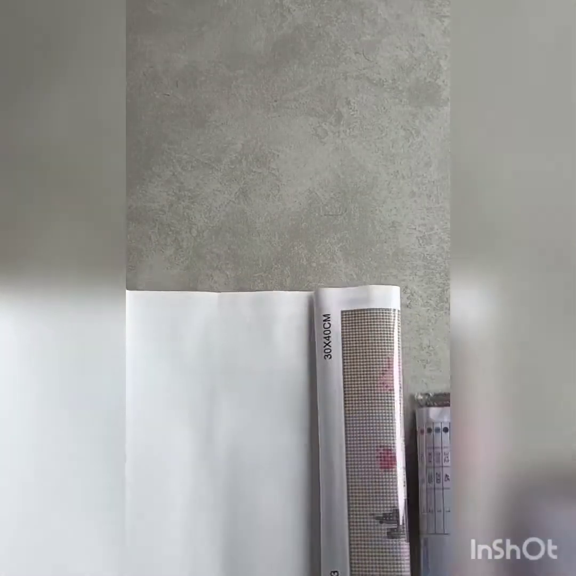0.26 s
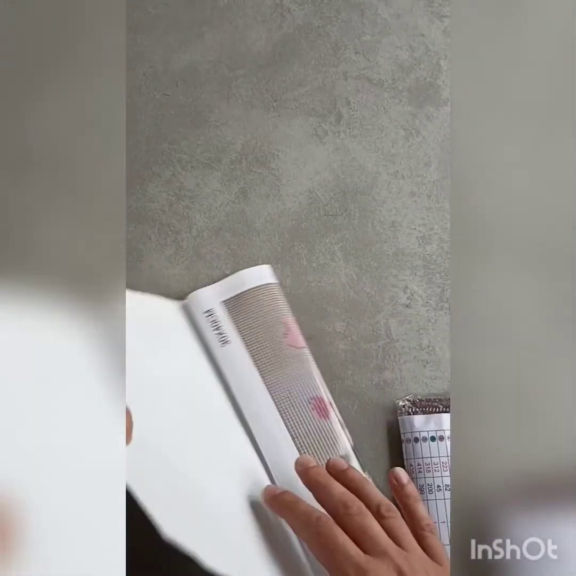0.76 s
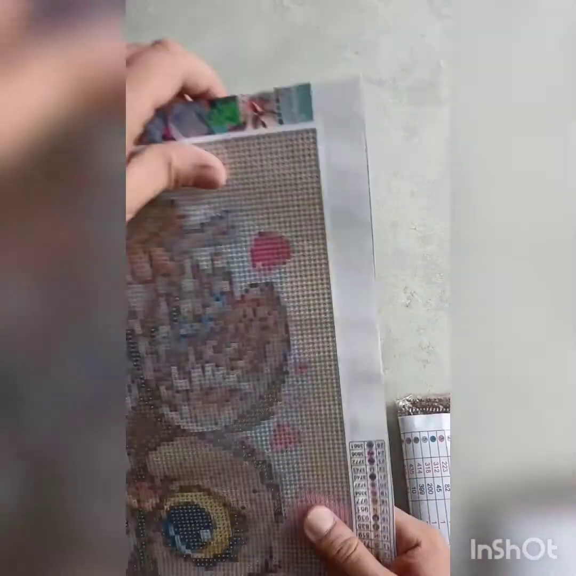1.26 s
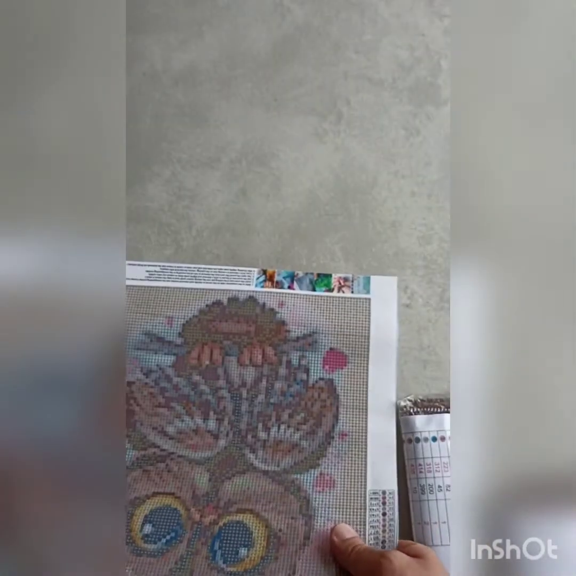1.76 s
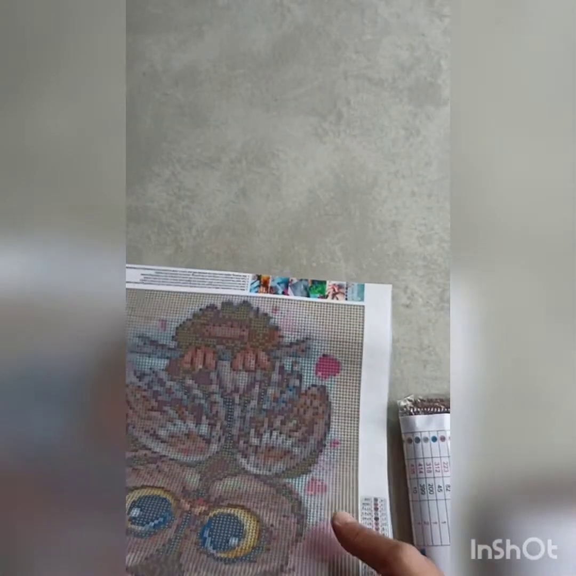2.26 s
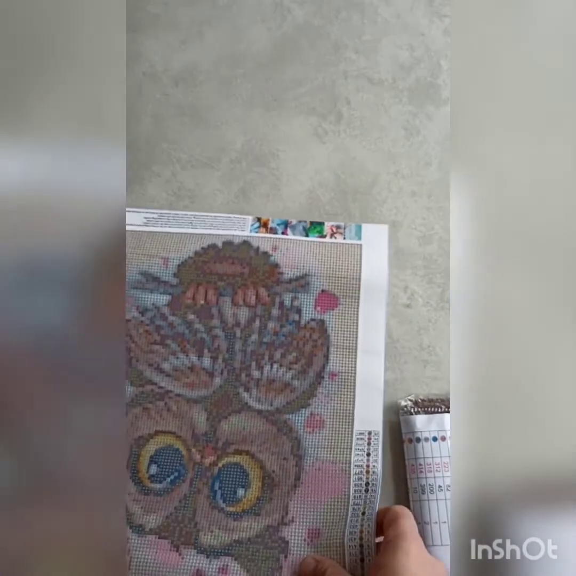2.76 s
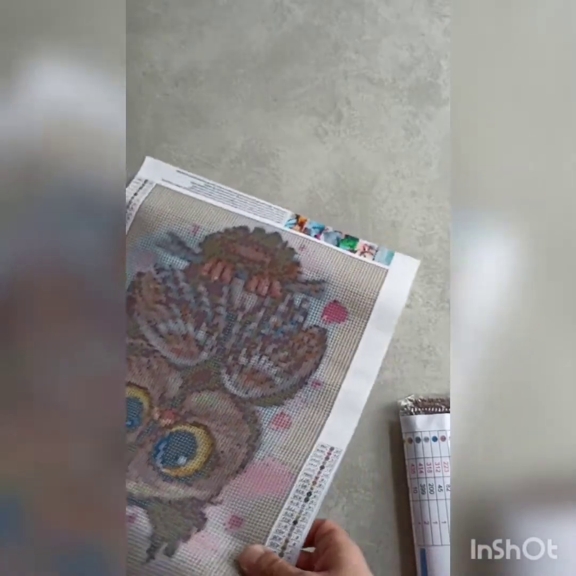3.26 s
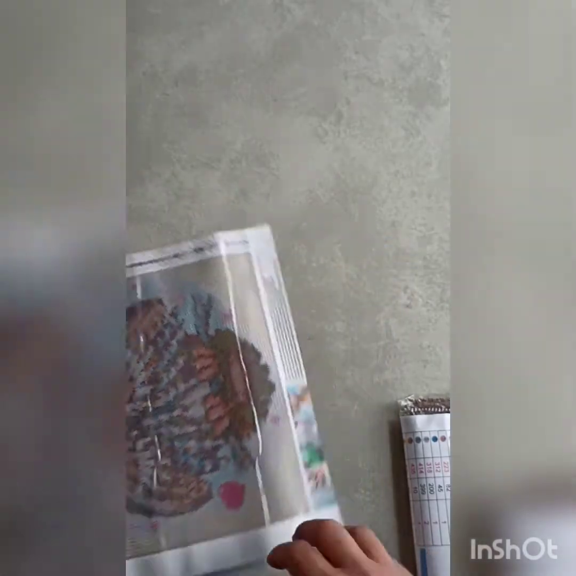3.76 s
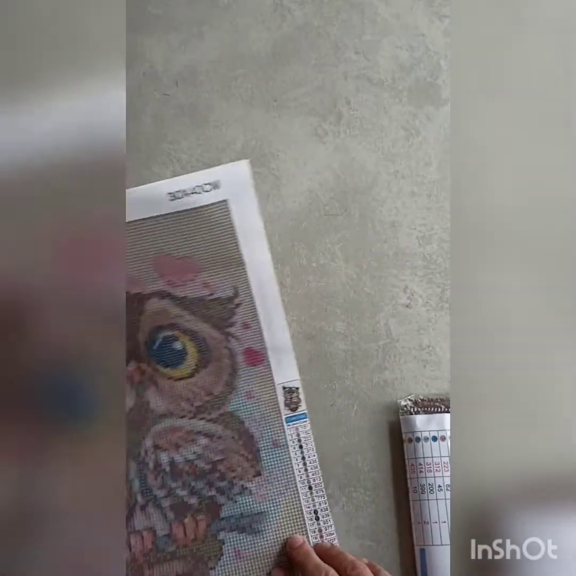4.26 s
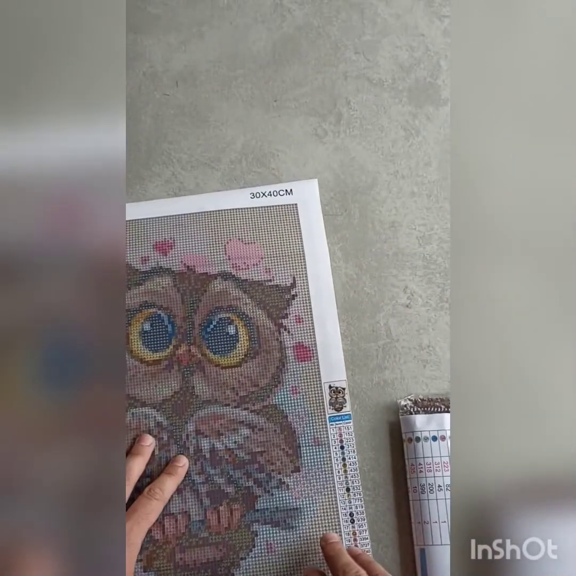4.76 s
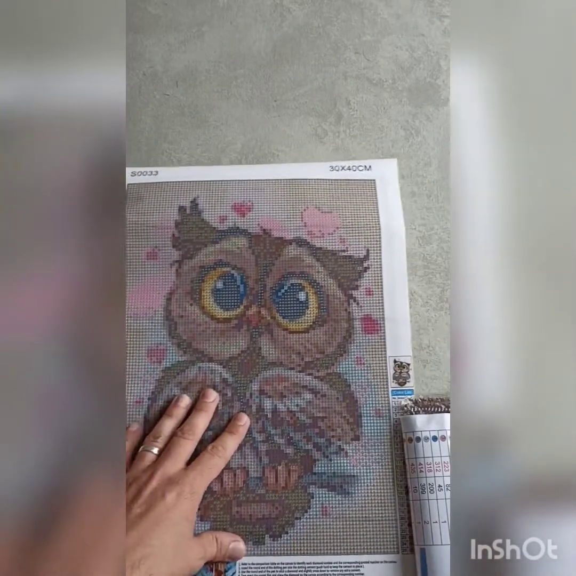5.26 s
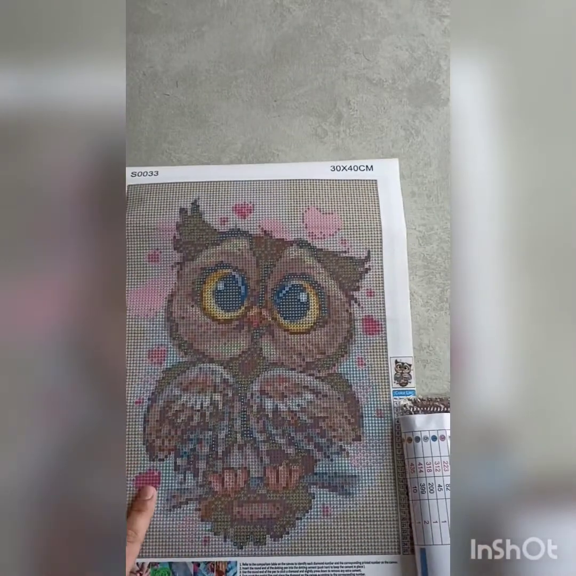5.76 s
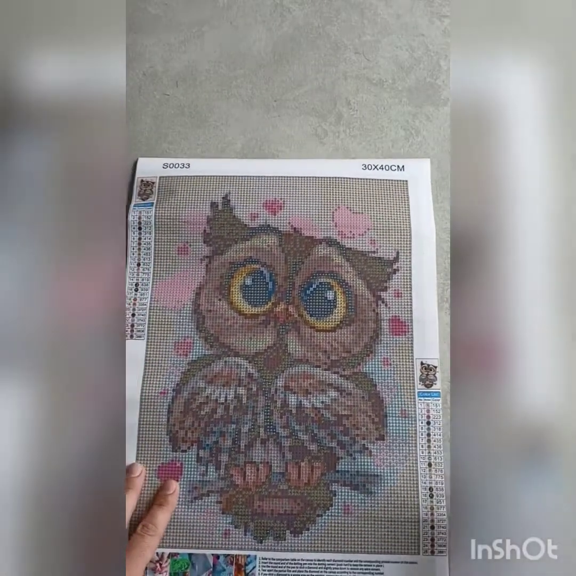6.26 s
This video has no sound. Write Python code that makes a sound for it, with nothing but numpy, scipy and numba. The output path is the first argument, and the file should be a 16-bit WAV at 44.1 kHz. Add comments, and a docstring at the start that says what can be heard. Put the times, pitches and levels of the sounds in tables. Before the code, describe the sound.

A close stereo pickup in a small, hard, quiet room with a faint low room tone. From 0 s a stiff film-covered sheet rustles under hands; at 0.1-0.5 s come small pops, bright film ticks and an edge knocking and skidding. Stronger scraping strokes with airy hiss run from 0.5 to 1.3 s, with soft hollow pops near 0.9 and 1.2. At 1.5 s two lesser pops lead into a very loud, sharp snap at 1.6, ringing under half a second. Quieter rustling follows, with a brisk swish near 2.4, a very faint falling whistle at 2.55 and a dull pop at 2.65. Softer pops come near 3.0 and 3.5 as the sheet slides round. A second loud, clustered snap hits at 4.5. Smooth, hissy rubbing strokes continue to 5.3, ease off, return near 6, then end with light pops around 6.1-6.3.

```python
"""A stiff, film-covered printed canvas is unrolled, turned round and smoothed by hand on a table, for 6.5 s.
From the start it rasps and hisses as hands push it (filtered contact noise) over the still air of a room.
Soft pops (resonated impulses), film crackles (noise ticks) and edge brushes (noise skids) soon join in.
Loud snaps come near 1.6 and 4.5 s, with a faint falling whistle near 2.55 s; a small hard room rings
after pops, ticks and brushes. Two microphone ports a short way apart give left and right."""
import sys
import numpy as np
from scipy import signal
from scipy.fft import rfft, irfft
from scipy.io import wavfile
from scipy.ndimage import uniform_filter1d
from numba import njit

SR = 44100
rng = np.random.default_rng(int(sys.argv[2]) if len(sys.argv) > 2 else 0)


def dump_mix(stems):
    """Bounce the given channels to the path in sys.argv[1] as a 16-bit WAV at rate SR."""
    frames = np.atleast_2d(stems).T  # one column per channel
    limited = np.clip(frames, -1, 1)  # hard clip at full scale
    pcm = np.round(limited * 32767).astype(np.int16)
    wavfile.write(sys.argv[1], SR, pcm)


N = 287091

TIME = np.arange(N) / SR
FREQ = np.maximum(np.arange(N // 2 + 1) * SR / N, 1)
PORT_DELAY_S = .00033  # longest travel time between the ports

# The patch of sheet that rubs. Each row: time in seconds, resonance in Hz, coarseness in dB
# (added to grain_db), lead of the right port in ms.
RUBBING_PATCH = [(.3, 1498, -8.5, -0.027), (.75, 2370, -5, .1), (.98, 1540, -3.5, 0.13),
                 (1.22, 1130, 1, .13), (2.25, 1373, -4.5, .15), (3.1, 1325, -9.5, .13),
                 (3.6, 1203, -11.5, 0.13), (3.85, 1388, -17.5, 0.083), (4.1, 1283, -18.5, .1),
                 (4.4, 1383, -3, 0.11), (4.9, 1122, -11.5, -0.087), (5.3, 1066, -15.5, -0.095),
                 (6.1, 1178, -9, -0.0071)]


def undb(db):
    """Decibels to gain."""
    return 10 ** (np.asarray(db) / 20)


def unit(x):
    """Scale to rms 1."""
    return x / np.sqrt(np.mean(x ** 2))


def curve(rows, axis):
    """One column of a time table at every sample."""
    rows = np.array(rows)
    return np.interp(TIME, rows[:, 0], rows[:, axis])


def along(rows, hz, axis=1):
    """One column of a frequency table, interpolated on log frequency."""
    rows = np.array(rows)
    return np.interp(np.log(hz), np.log(rows[:, 0]), rows[:, axis])


def colour(x, rows):
    """Filter by a (Hz, dB) table."""
    return irfft(rfft(x) * undb(along(rows, FREQ)), N)


def pan(db):
    """Left and right gains for a level difference, left minus right."""
    return undb(np.vstack([db, -db]) / 2)


def resonate(x, hz, q):
    """Two-pole band-pass."""
    g = np.tan(np.pi * hz / SR)
    return signal.lfilter([g / q, 0, -g / q], [1 + g / q + g * g, 2 * g * g - 2, 1 - g / q + g * g], x)


def add(out, s, sound):
    """Mix a sound in at time s."""
    i = int(s * SR)
    out[:, i:i + sound.shape[1]] += sound[:, :N - i]


def diffuse(likeness=0.49):
    """Noise from all sides at two ports: partly alike in the bass, nearly unrelated in the treble."""
    like = likeness * np.sinc(2 * FREQ * PORT_DELAY_S)
    mid, side = rfft(rng.standard_normal((2, N))) * np.sqrt([1 + like, 1 - like])
    return unit(irfft(np.array([mid + side, mid - side]), N))


def walk(rate_hz):
    """Smooth random motion of rms 1."""
    size = int(SR / rate_hz)
    steps = np.repeat(rng.standard_normal(N // size + 1), size)
    return unit(uniform_filter1d(steps, size)[:N])


def strokes():
    """Each push speeds up, holds and slows to rest; rasp and hiss follow its speed. Gives the gain of both."""
    # Each row: start in seconds, speeding up in s, steady in s, slowing to rest in s,
    # rasp gain in dB at full speed, hiss gain in dB at full speed, hiss left minus right in dB.
    pushes = [(0.0, 0.0033, .02, 0.36, -62.5, -61.5, -4), (.06, 0.18, .16, .04, -64.5, -58, -1),
              (.277, 0.069, .13, .095, -49.5, -47, -3.5), (.459, 0.017, .01, .43, -55, -48, 1),
              (.608, .25, 0.017, 0.033, -51, -46, 1), (.83, 0.14, 0.031, 0.38, -47, -47.5, -2),
              (1.16, 0.039, 0.022, 0.79, -51.5, -54, -2.5), (1.56, 0.045, 0.067, 0.25, -51, -43, -1),
              (1.913, .12, 0.0077, 0.17, -56.5, -60.5, -1.5), (2.11, 0.11, .15, .5, -57, -59, -2),
              (2.228, .198, 0.0064, 0.16, -46.5, -41.5, -0.5), (2.501, 0.16, 0.008, 0.2, -52, -50, -3),
              (2.69, .02, 0.33, .15, -59, -60, -1.5), (2.9, 0.25, 0.028, 0.32, -52.5, -48, -1.5),
              (3.282, 0.18, 0.2, 0.15, -54, -53.5, -3), (3.451, .44, 0.16, 0.35, -51.5, -47, -0.5),
              (4.1, 0.22, 0.046, 0.068, -50.5, -44.5, -1), (4.344, .076, .01, 0.93, -49.5, -48.5, -3),
              (4.757, 0.28, 0.089, .42, -48, -46.5, -1), (5.055, .18, 0.051, 0.18, -48.5, -46, -1),
              (5.663, 0.43, 0.061, 0.25, -50, -53, -4), (5.708, 0.056, 0.0082, 0.05, -54.5, -55.5, 2),
              (6.274, 0.16, 0.0088, 0.15, -55.5, -58, -0.5)]
    rasp_power, hiss_power = 0.63, 1.14  # gain grows as these powers of speed
    # the sheet never lies quite still under the hands
    creep_rasp_db, creep_hiss_db = -74.5, -75
    rasp, hiss = undb(creep_rasp_db) ** 2, undb(creep_hiss_db) ** 2
    for s, rise_s, hold_s, stop_s, rasp_db, hiss_db, pan_db in pushes:
        rising = np.clip((TIME - s) / rise_s, 0, 1)
        stopping = np.clip((TIME - s - rise_s - hold_s) / stop_s, 0, 1)
        speed = (np.sin(np.pi / 2 * rising) * (1 - stopping)) ** 2
        rasp = rasp + (undb(rasp_db) * speed ** rasp_power) ** 2
        hiss = hiss + (undb(hiss_db) * pan(pan_db) * speed ** hiss_power) ** 2
    return np.sqrt(rasp), np.sqrt(hiss)


def friction(spectrum, slip_rate_hz, slip_db, grain_rate_hz, grain_db, spread_db, direct_db):
    """Countless tiny contacts with a few sharper catches; the sheet slips in uneven jerks."""
    catches = (rng.random(N) < grain_rate_hz / SR) * rng.choice([-1, 1], N)
    catches = unit(catches * undb(spread_db * np.minimum(rng.exponential(size=N), 3)))
    coarse = undb(grain_db + curve(RUBBING_PATCH, axis=2))
    direct = undb(direct_db) * rng.standard_normal(N) + coarse * catches
    # the straight path reaches one port first; the rest comes from all sides
    lead = np.round(curve(RUBBING_PATCH, axis=3) * SR / 1000).astype(int)
    right = direct[(np.arange(N) + lead) % N]
    contacts = diffuse() + np.array([direct, right])
    contacts = contacts / np.sqrt(1 + undb(direct_db) ** 2 + coarse ** 2)
    jerks = undb(slip_db * walk(slip_rate_hz))
    return unit(colour(contacts, spectrum) * jerks)


@njit
def sweep(x, hz, q):
    """Band-pass with a moving centre, on both channels."""
    y = np.empty_like(x)
    for c in range(2):
        band, low = 0., 0.
        for i in range(len(hz)):
            g = np.tan(np.pi * hz[i] / SR)
            v = (band + g * (x[c, i] - low)) / (1 + g * (g + 1 / q))
            band, low, y[c, i] = 2 * v - band, low + 2 * g * v, v / q
    return y


def sliding(drum_db=-16, drum_growth=0.51):
    """The weave rasps and rings the rubbing patch, the sheet drums with it, the smooth film hisses."""
    # Each row: frequency in Hz, level in dB.
    rasp_colour = [(100, -43), (450, -48.5), (750, 0.5), (1100, 0.5), (1800, -0.5), (2500, -4.5),
                   (3400, -3), (4500, -3.5), (8000, -30)]
    drum_colour = [(30, -25), (90, -7), (140, -8.5), (300, 4), (600, 4.5), (900, -1.5), (1500, -27.5),
                   (6000, -49)]
    hiss_colour = [(300, -37.5), (1500, 0.5), (3000, 1), (4500, 0.5), (6500, 2), (8000, 1.5), (11000, 0.5),
                   (13000, -2), (16000, -10)]
    rasp_gain, hiss_gain = strokes()
    patch_hz = curve(RUBBING_PATCH, axis=1)

    rasp = friction(rasp_colour, slip_rate_hz=70, slip_db=1.76, grain_rate_hz=330, grain_db=-2.5,
                    spread_db=4.0, direct_db=-8.0)
    patch_q, patch_db, overtone_ratio, overtone_db = 7., 4, 1.68, 3
    ring = undb(patch_db) * sweep(rasp, patch_hz, patch_q)
    overtone = undb(overtone_db) * sweep(rasp, patch_hz * overtone_ratio, patch_q)
    rasp = unit(rasp + ring + overtone)

    drum = friction(drum_colour, slip_rate_hz=40, slip_db=3.0, grain_rate_hz=160, grain_db=-7.5,
                    spread_db=-2.0, direct_db=-4.0)
    # coarser contact shakes the whole sheet more
    finest_db = np.array(RUBBING_PATCH)[:, 2].min()
    drum = drum * undb(drum_db + drum_growth * (curve(RUBBING_PATCH, axis=2) - finest_db))

    hiss = friction(hiss_colour, slip_rate_hz=83, slip_db=1.15, grain_rate_hz=1600, grain_db=1.0,
                    spread_db=5.0, direct_db=-7.5)
    return (rasp + drum) * rasp_gain + hiss * hiss_gain


def still_air(rms_db=-63):
    """The room's quiet background: steady noise from all sides, strongest in the bass."""
    # Each row: frequency in Hz, level in dB.
    air_colour = [(20, -19.5), (45, -8), (100, 9.5), (200, 7), (400, 3.5), (700, -6), (1500, -14.5),
                  (4000, -32.5), (8000, -44), (16000, -38)]
    return undb(rms_db) * unit(colour(diffuse(), air_colour))


def scatter(x, most_s=.008):
    """Each spot on the sheet has its own paths into the room: every pitch is a little differently late."""
    size = x.shape[1]
    delay_s = most_s * rng.random(size // 2 + 1)
    phase = 2 * np.pi * np.cumsum(delay_s) * SR / size
    return irfft(rfft(x) * np.exp(-1j * phase))


def buckles(pitch_split=0.063, near_db=4, thud_hz=280, size=2048):
    """A curved patch flips: a brief ring over a dull push of air. Gives direct sound and room's share."""
    # Each row: time in seconds, peak in dB, pitch in Hz, sharpness Q, gain of the thud in dB,
    # lead of the right port in ms.
    flips = [(.0896, -42, 1900, 3, -30, .09), (.2312, -38, 1000, 1.2, -16, .07),
             (.4676, -32, 700, .8, -8, .11), (.8613, -32, 880, 1.6, -20, .11),
             (.8934, -37, 1100, 1, -16, .09), (1.1895, -35, 1250, 1.6, -20, .13),
             (1.2166, -33, 1150, 2, -20, .15), (1.4275, -41, 520, 2, -24, .25),
             (1.4335, -36, 1080, 2, -20, -.12), (1.5234, -22, 1200, 1.7, -26, .16),
             (1.5841, -20, 850, 3, -26, -.04), (1.5875, -1, 860, 1.15, -18, -.04),
             (1.956, -46, 380, 3, -26, .22), (2.1043, -42.5, 1100, 1.3, -14, .15),
             (2.638, -29, 800, 1.2, -4, .2), (2.7234, -38, 880, 1.2, -8, .18),
             (2.7975, -43, 480, 1.5, -14, .3), (2.861, -45, 370, 3.5, -26, .22),
             (3.0088, -32, 850, 1.9, -12, .2), (3.119, -36, 1220, 2.5, -20, .09),
             (3.4703, -30, 1500, .5, -6, .18), (3.5044, -39, 800, 1, -6, .22),
             (4.4584, -27, 1000, 2, -22, .04), (4.4806, -4, 1000, .9, -22, -.03),
             (4.4814, -9, 1400, 2, -30, .1), (4.4839, -2, 860, 1.05, -22, -.05),
             (6.077, -39, 600, 1.3, -12, 0), (6.2311, -35, 3080, 7, -36, .3),
             (6.2721, -42, 560, 1.2, -16, .3), (6.3333, -44, 550, .9, -16, .3)]
    direct, sent = np.zeros((2, N)), np.zeros((2, N))
    push_at = size // 64
    push = signal.unit_impulse(size, push_at)
    freq = np.arange(size // 2 + 1) * SR / size
    thud = resonate(push, thud_hz, q=0.6)
    for s, db, hz, q, thud_db, lead_ms in flips:
        # each port faces its own part of a broad patch, so their pitches differ a little
        split = pitch_split / max(q, 1)
        left, right = (resonate(resonate(push, port_hz, q), port_hz, q) + undb(thud_db) * thud
                       for port_hz in (hz * (1 - split), hz * (1 + split)))
        right = irfft(rfft(right) * np.exp(2j * np.pi * freq * lead_ms / 1000))
        flip = undb(db) * np.array([left, right]) / abs(left + right).max() * 2
        # pops far to the right are close to that port: louder there, and drier
        near = np.clip(lead_ms / 1000 / PORT_DELAY_S, 0, 1) ** 3
        start_s = s - push_at / SR
        add(direct, start_s, flip * pan(-near_db * near))
        add(sent, start_s, scatter(flip) * (1 - near))
    return direct, sent


def room(x, wet_db=-4, build_s=0.0025, hold_s=0.017, echo_rate_hz=350, echo_db=-4, size=32768):
    """Wall echoes hold the level briefly, then a dense tail dies, mostly sooner in the treble, and modes ring."""
    # Each row: frequency in Hz, level in dB, t60 in seconds.
    tail_bands = [(30, -17, .4), (108.7, -0.5, 0.49), (288, 6, 0.39), (456, -1, 0.48), (850, -4, 0.36),
                  (1430, -7, 0.45), (2420, 4.5, 0.36), (4600, 7, 0.34), (8200, 0, 0.27), (15450, -2, 0.3)]
    modes = [(285, -58, .35), (385, -62, .55), (447, -61, .42), (554, -69, .34), (630, -55.5, .36),
             (717, -63, .4), (840, -66, .3), (1245, -66, .38), (1454, -64, .36)]
    t, freq = TIME[:size], np.maximum(np.arange(size // 2 + 1) * SR / size, 1)
    echoes = unit((rng.random(size) < echo_rate_hz / SR) * rng.standard_normal(size))
    field, tail = rfft(diffuse()[:, :size] + undb(echo_db) * echoes), 0
    age_s = np.hypot(t, hold_s) - hold_s
    band_hz = np.array(tail_bands)[:, 0]
    # overlapping bands, each with its own decay
    for share, (_, db, t60_s) in zip(np.eye(len(tail_bands)), tail_bands):
        band = np.interp(np.log(freq), np.log(band_hz), share)
        tail = tail + undb(db) * irfft(field * band) * np.exp(-np.log(1000) * age_s / t60_s)
    # wet_db is the mean gain from 500 to 2000 Hz, before the modes and build-up
    middle = (freq > 500) & (freq < 2000)
    tail = undb(wet_db) * tail / np.sqrt(np.mean(abs(rfft(tail)[:, middle]) ** 2))
    for hz, db, t60_s in modes:
        ring = np.sin(2 * np.pi * (hz * t + rng.random()))
        tail = tail + undb(db) * ring * np.exp(-np.log(1000) * t / t60_s)
    build = 1 - np.exp(-(t / build_s) ** 2)
    return signal.fftconvolve(x, tail * build, axes=1)[:, :N]


def crackles(q=2.0, gain_db=2, decay_s=.0007, size=512):
    """Creases in the film let go in bright, very short ticks, each with its own left-right balance."""
    # Each row: time in seconds, level in dB before gain_db, brightness in Hz, left minus right in dB.
    creases = [(.1348, -37.5, 6000, -2), (.3543, -29, 9400, 6), (.3944, -27, 8050, 2),
               (.5297, -25, 6800, 2), (1.1543, -35.5, 11500, 3), (1.1847, -38, 10300, -1),
               (1.3055, -36, 9900, -9), (1.3614, -25, 9670, -5), (1.542, -31, 9800, -3),
               (1.5895, -17, 7100, -1), (1.7114, -22.5, 12360, 1), (1.8074, -36, 9700, 0),
               (2.295, -23.5, 11800, -7), (2.7082, -36, 12000, -1), (2.737, -32.5, 12400, -1),
               (2.8469, -38, 13000, -10), (3.5303, -37, 13200, 0), (4.4816, -15.5, 4200, 3),
               (4.794, -34, 12300, 1), (5.411, -51, 13500, -5.5), (5.9481, -30.5, 5100, 1)]
    out = np.zeros((2, N))
    for s, db, hz, pan_db in creases:
        tick = resonate(rng.standard_normal(size) * np.exp(-TIME[:size] / decay_s), hz, q)
        lag = int(rng.random() * PORT_DELAY_S * SR)
        ports = np.array([tick, np.roll(tick, lag)])
        add(out, s, undb(db + gain_db) * pan(pan_db) * ports / abs(tick).max())
    return out


def brushes(attack_s=.0006, size=8192):
    """An edge lands on the table and skids to a stop: band-passed noise that dies away."""
    # Each row: start in seconds, rms in dB before attack and decay, centre in Hz, Q, decay in seconds.
    skids = [(0.154, -44, 7000, 0.06, 0.013), (0.3221, -30.5, 2020, .6, 0.0087),
             (0.326, -22, 9200, 0.078, 0.0035), (.469, -37, 500, 0.2, 0.019), (.951, -37, 1570, 2.7, 0.03),
             (0.973, -39.5, 1870, 1.1, 0.018), (1.024, -42, 1400, 2.6, .025), (1.085, -39, 1360, 2, .024),
             (1.203, -39.5, 1138, 2.2, .017), (1.362, -33, 10800, 0.97, 0.0077),
             (3.057, -47, 11000, 0.6, 0.054), (3.468, -46.5, 900, 1.1, 0.023),
             (3.501, -49, 157, 1.2, 0.012), (3.802, -45.5, 1520, 9.5, 0.058),
             (6.076, -34.5, 540, 3.9, 0.0028)]
    out, t = np.zeros((2, N)), TIME[:size]
    for s, db, hz, q, decay_s in skids:
        # one part common to both ports, one part each port's own
        noise = rng.standard_normal(size) + rng.standard_normal((2, size))
        skid = unit(resonate(noise, hz, q))
        add(out, s, undb(db) * skid * np.exp(-t / decay_s) * (1 - np.exp(-t / attack_s)))
    return out


def squeak(waver=.008):
    """The film sticks and slips for a moment in a faint falling whistle: a wavering sine."""
    s, length_s, start_hz, end_hz, db = 2.548, .07, 5100, 4480, -58
    progress = np.clip((TIME - s) / length_s, 0, 1)
    hz = (start_hz + (end_hz - start_hz) * progress) * (1 + waver * walk(600))
    swell = np.sin(np.pi * progress ** 2)
    return undb(db) * swell * np.sin(2 * np.pi * np.cumsum(hz) / SR)


def scene():
    """The sliding sheet, still air, pops and ticks with their reverberation, and the squeak."""
    slide, air = sliding(), still_air()
    pops, pops_sent = buckles()
    ticks = crackles() + brushes()
    reverb = room(pops_sent + undb(-4.0) * ticks)
    return slide + air + pops + ticks + reverb + squeak()


def record(dry):
    """Each port has its own treble colour; the loudest peaks are rounded and the top is cut."""
    # Each row: frequency in Hz, level in dB.
    mic_colour = [(400, 0), (3450, 0), (3700, -3), (6700, -1), (7050, -3), (11450, -2), (11750, 4),
                  (13000, 2), (14200, 1.5), (16000, 2.5)]
    # Each row: frequency in Hz, left minus right in dB.
    mic_balance = [(3200, 0.5), (3900, -2.5), (6600, -2.5), (7400, -7), (13000, 14.5), (15500, -4.5)]
    top_hz = 15900
    ports = undb(along(mic_colour, FREQ)) * pan(along(mic_balance, FREQ))
    heard = irfft(rfft(dry) * ports, N)
    rounded = heard / (1 + heard ** 6) ** (1 / 6)
    low_pass = signal.ellip(10, .2, 70, top_hz, fs=SR, output="sos")
    return signal.sosfilt(low_pass, rounded)


dry = scene()
out = record(dry)
dump_mix(out)
```